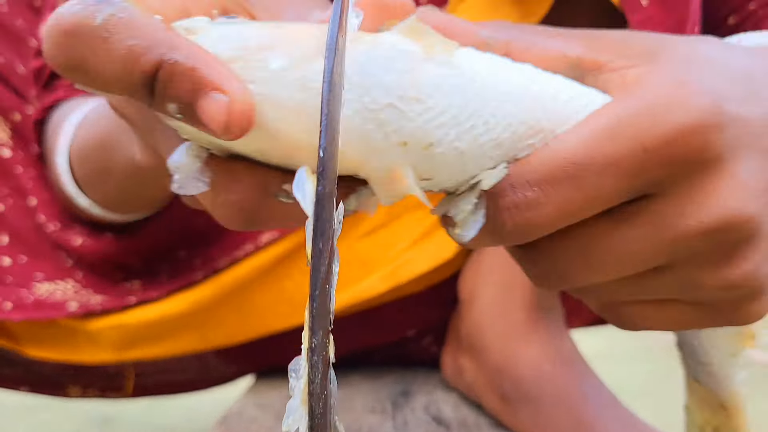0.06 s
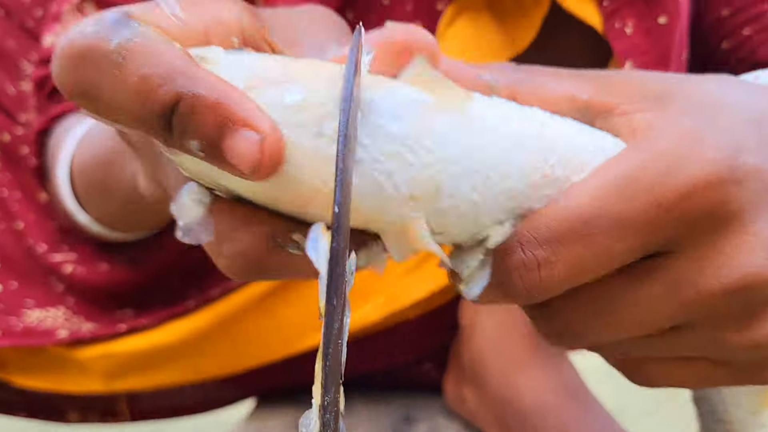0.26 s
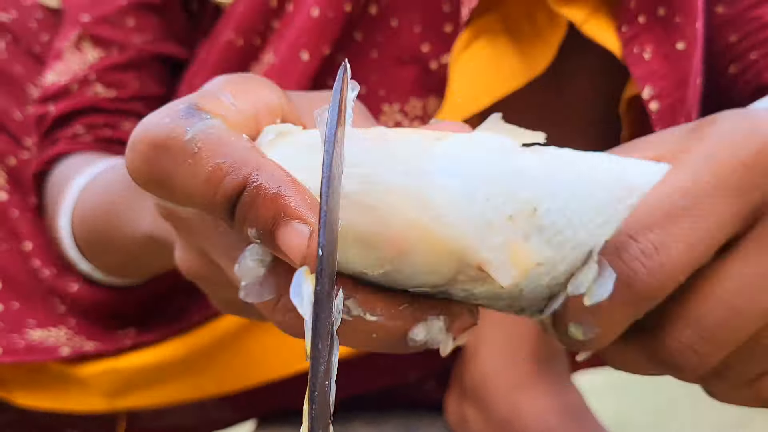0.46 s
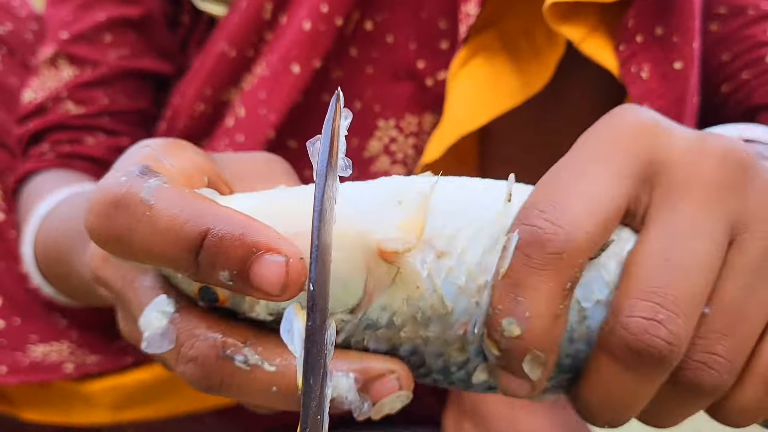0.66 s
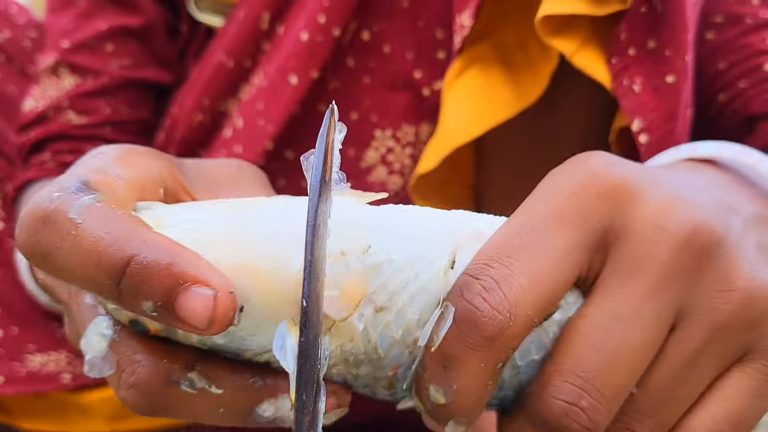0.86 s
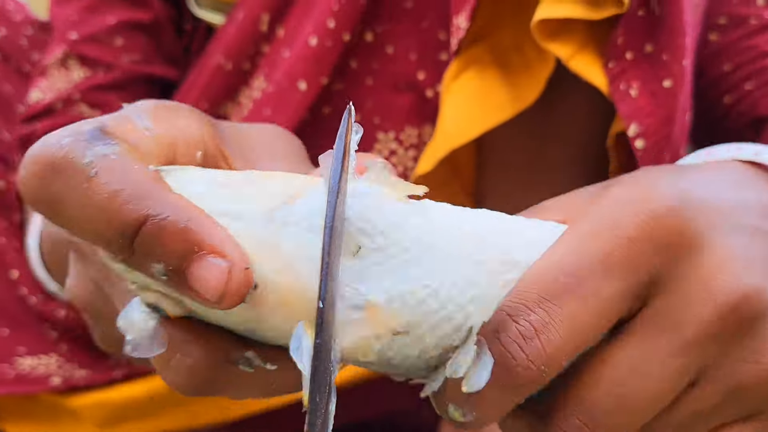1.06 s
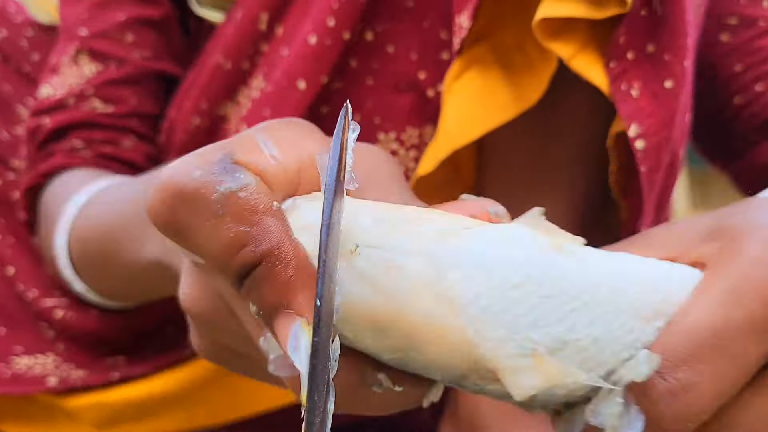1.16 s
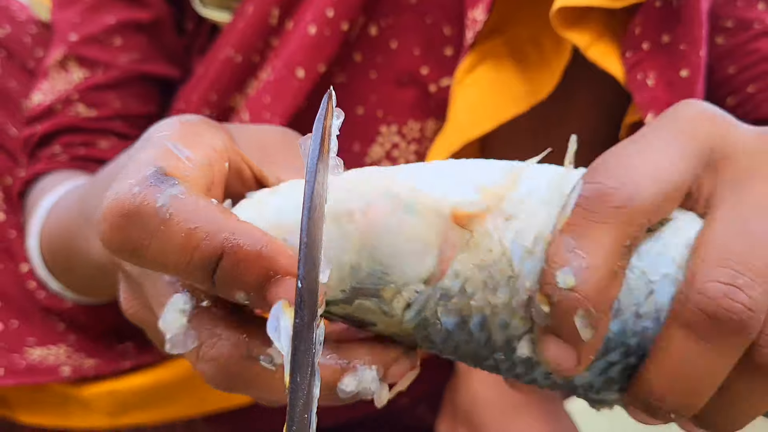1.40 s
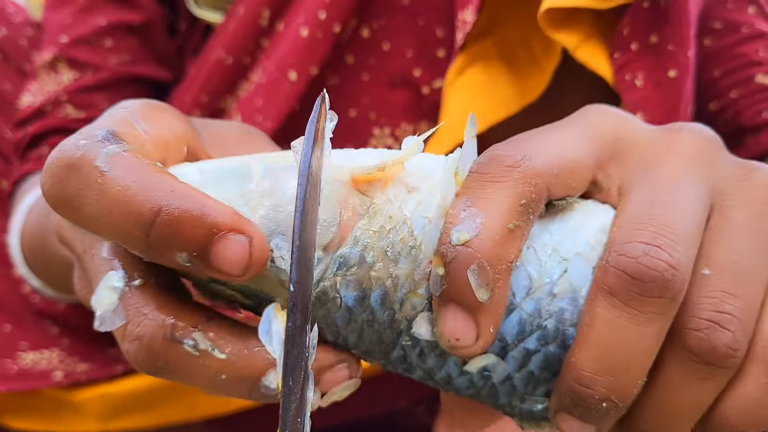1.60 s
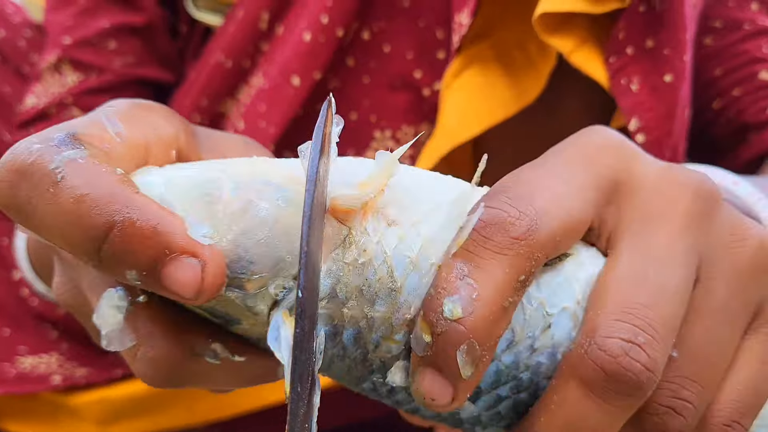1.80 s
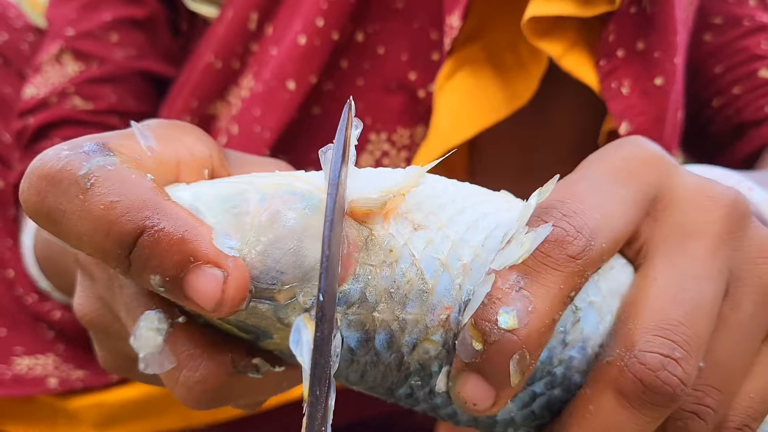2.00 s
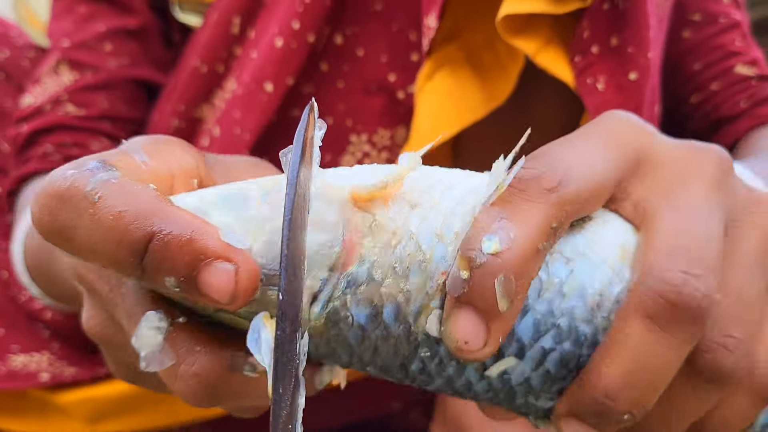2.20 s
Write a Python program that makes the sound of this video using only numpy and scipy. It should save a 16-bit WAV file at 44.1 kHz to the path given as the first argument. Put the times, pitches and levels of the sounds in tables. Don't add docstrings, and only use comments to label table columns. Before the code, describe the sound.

Fish scales rasp over a steel blade, very close and bright. After a faint touch at 0.1 s, a hard crackling stroke at 0.2-0.33 s knocks, rings and briefly squeals. Quiet hand rustle and small ticks follow. A second dense, snapping stroke comes at 1.0-1.1 s, then light wet ticks around 1.75-1.85 and catches at 2.05 s. A distant engine throbs low throughout; a faint bird chirps near 1.6 s.

```python
import sys
import numpy as np
from scipy import signal
from scipy.fft import rfft, irfft
from scipy.io import wavfile
from scipy.ndimage import uniform_filter1d

SR = 44100
rng = np.random.default_rng(int(sys.argv[2]) if len(sys.argv) > 2 else 0)


def linear_from_db(decibels):
    return 10 ** (np.asarray(decibels, float) / 20)


def bounce(signal):
    frames = np.transpose(np.atleast_2d(signal))
    limited = np.clip(frames, -1, 1)
    pcm = np.round(limited * 32767).astype(np.int16)
    wavfile.write(sys.argv[1], SR, pcm)


N = 99225
T = np.arange(N) / SR

# pitch_hz, level_db, t60_s
FOOT_MODES = [(1098, -3.5, 0.053), (1203, 0, 0.17), (1410, 3.5, 0.014), (2050, 3, 0.015)]


def unit(x):
    return x / np.sqrt(np.mean(x ** 2))


def curve(rows, outside=None):
    r = np.array(rows, float)
    return np.interp(T, r[:, 0], r[:, 1], left=outside, right=outside)


def response(points):
    p, size = np.array(points, float), 4096
    log_hz = np.log(np.maximum(np.arange(size // 2 + 1), .5) * SR / size)
    low, high = np.log(p[0, 0]), np.log(p[-1, 0])
    beyond = np.maximum(low - log_hz, 0) + np.maximum(log_hz - high, 0)
    db = np.interp(log_hz, np.log(p[:, 0]), p[:, 1]) - 20 * beyond
    cepstrum = irfft(db * np.log(10) / 20)
    cepstrum[1:size // 2] *= 2
    cepstrum[size // 2 + 1:] = 0
    return irfft(np.exp(rfft(cepstrum)))[:size // 2]


def through(x, h):
    return signal.fftconvolve(np.atleast_2d(x), h[None], axes=1)[:, :N]


def filtered(x, order, hz, kind):
    return signal.sosfilt(signal.butter(order, hz, kind, fs=SR, output="sos"), x)


def decay(t, t60_s):
    return np.exp(-np.log(1000) * t / t60_s)


def ring(modes):
    t = T[:SR // 2]
    h = sum(linear_from_db(db) / np.sqrt(t60) * np.sin(2 * np.pi * hz * t) * decay(t, t60) for hz, db, t60 in modes)
    return h / np.sqrt(np.sum(h ** 2))


def walk(rate_hz):
    k = int(SR / rate_hz)
    steps = np.repeat(rng.standard_normal(N // k + 1), k)
    return unit(uniform_filter1d(uniform_filter1d(steps, k), k)[:N])


def pair(count):
    own, shared = rng.standard_normal((2, count))
    share = 0.99
    return np.array([share * own + np.sqrt(1 - share ** 2) * shared, shared])


def grains(per_s, spread_db, tail_s):
    strength = linear_from_db(spread_db * np.minimum(rng.exponential(size=N), 3))
    hits = (rng.random(N) < per_s / SR) * strength
    return unit(through(hits, np.exp(-T[:SR // 20] / tail_s)) * pair(N))


def bursts(rows):
    rise_ms, click_share = 0.11, 1.2
    out, ms_t = np.zeros((2, N + SR)), T[:SR // 20] * 1000
    for s, db, decay_ms in rows:
        i = int(s * SR)
        shape = np.minimum(ms_t / rise_ms, 1) * np.exp(-ms_t / max(decay_ms, .2))
        energy = np.sum(shape ** 2)
        spray = pair(len(ms_t)) * shape
        spray[:, np.argmax(shape)] = click_share * np.sqrt(energy)
        level = np.sqrt(energy / np.sum(spray ** 2, axis=1))[:, None] / 2
        out[:, i:i + len(ms_t)] += linear_from_db(db) * spray * level
    return out[:, :N]


def scraping():
    # start_s, pressure_db
    strokes = [
        [(.12, -52.5), (.138, -38), (.152, -47), (.165, -74)],
        [(.186, -42), (.204, -41.5), (.208, -28.5), (.222, -32.5), (.241, -32.5), (.256, -26), (.28, -20),
         (.305, -33.5), (.335, -66.5)],
        [(.998, -43), (1.03, -31.5), (1.04, -26.5), (1.06, -23.5), (1.088, -27), (1.1, -40), (1.125, -68),
         (1.155, -43.5), (1.195, -68)],
        [(1.735, -69.5), (1.748, -44.5), (1.77, -78), (1.8, -53.5), (1.82, -54), (1.86, -54)],
        [(2.035, -51), (2.053, -36), (2.068, -36.5), (2.078, -57)],
        [(2.17, -62.5), (2.21, -50), (2.25, -54.5)],
    ]
    stroke_ring_db = [-23, -5.5, -15, -19, -27, -21]
    # start_s, peak_db, decay_ms
    snaps = [(.2068, -13, 2), (.2482, -4.5, 1.4), (.2515, -5.5, 0.45), (.2708, 5, 0.35), (1.005, -4, 0.29),
             (1.0122, -2.5, 0.34), (1.0165, 3, 0.3), (1.0295, 2, 0.37), (1.037, -3.5, 0.33),
             (1.0448, -12.5, 0.59), (1.0475, -14, 0.64), (1.069, -9.5, .4), (1.074, -6.5, .4),
             (1.0838, -4.5, 0.32), (.217, -14, 0.41), (.2216, -15.5, 0.41), (.226, -13, .6),
             (.239, -22, 0.5), (.255, -6.5, 0.73), (.306, -23, 0.45), (.3117, -15, .6), (1.0535, -1, .4),
             (1.0585, 7, 0.43), (1.0648, -6, 0.32), (1.0768, -13.5, 0.59), (1.0815, -5, 0.31),
             (1.0905, -13, 0.38), (2.117, -27.5, 4.4)]
    # pitch_hz, level_db
    crackle_colour = [(600, -27), (2000, -18), (2500, -7.5), (3000, -4), (6000, 4.5), (7200, 3),
                      (8500, -13.5), (11000, -31)]
    # pitch_hz, level_db
    treble_colour = [(9000, -43), (11500, -20.5), (13500, -7), (15500, -15)]
    # pitch_hz, level_db, t60_s
    blade_modes = [(2022, -14, 0.037), (2764, -9.5, 0.037), (3986, -6.5, 0.021), (5130, -44, 0.06),
                   (6440, -24, .04), (6490, -12.5, 0.017), (9300, -23.5, 0.056), (12600, -26, 0.067)]
    # pitch_hz, level_db, t60_s
    held_bend = [(482, 1, .13)]
    body, top = response(crackle_colour), response(treble_colour)
    norm = np.sqrt(np.sum(body ** 2))
    body, top = body / norm, top / norm

    crackle = grains(per_s=2800, spread_db=4.5, tail_s=.0006)
    pressure = [uniform_filter1d(linear_from_db(curve(s, -200)), size=200) for s in strokes]
    hard = crackle * sum(pressure[:3]) + bursts(snaps)
    light = crackle * sum(pressure[3:])
    free = sum(linear_from_db(db) * (p > 1e-6) for p, db in zip(pressure, stroke_ring_db))

    tick, tick_top = ticks()
    thin = filtered(light + tick, 4, 2800, "high")
    foot_rub = linear_from_db(-16.5) * through(free * hard, ring(FOOT_MODES + held_bend))
    foot = filtered(foot_rub + knocks(), 2, 350, "high")
    direct = through(hard + thin, body) + through(hard + light + tick_top, top)
    blade = through(free * (hard + thin), ring(blade_modes))
    return direct + blade + foot + squeal() + pings()


def ticks():
    # start_s, peak_db, treble_db (over the peak)
    tick_rows = [(.1892, -29.5, -5.5), (0.372, -34, 15.5), (.508, -28, 2), (0.539, -35.5, 12),
                 (.711, -35.5, 7), (.924, -33.5, 5), (0.9581, -30, 2), (1.139, -22.5, 1.5), (1.18, -37, 18),
                 (1.229, -37, -8.5), (1.2446, -34, 5), (1.288, -27.5, -2), (1.359, -26, 7),
                 (1.6638, -34.5, 15), (1.6864, -36, 12), (1.694, -31, 5), (1.717, -36.5, 7),
                 (1.7425, -25.5, -4), (1.762, -36, 9.5), (1.7814, -17, 11.5), (1.7884, -25.5, 0),
                 (1.8112, -12.5, -11.5), (1.8152, -21, 4), (1.8352, -26, 7), (1.8481, -25.5, 12.5),
                 (1.9014, -32, -6.5), (1.9745, -19.5, -10), (2.0517, -14, 8), (2.1412, -31, 10),
                 (2.1619, -29, 1.5), (.9987, -35, -2), (1.1008, -31, 0.5), (1.1118, -26.5, 0.5),
                 (1.1162, -28, 1), (1.1533, -31, 0.5), (1.1577, -32, 2), (1.1676, -36, 0), (1.1835, -33, 0),
                 (1.7474, -30, -4), (1.7648, -40, -2), (1.7948, -33, 0), (1.8074, -25.5, 0),
                 (1.8182, -22, 3), (1.8406, -28, 0), (2.0634, -30, 0)]
    tick_ms = 0.8
    tick = bursts([(s, db, tick_ms) for s, db, _ in tick_rows])
    tick_top = bursts([(s, db + top_db, tick_ms / 2) for s, db, top_db in tick_rows])
    return tick, tick_top


def squeal():
    # start_s, length_s, level_db
    slips = [
        (0.2033, 0.007, -27.5),
        (.248, 0.0032, -11),
        (0.264, 0.0045, -12.5),
        (0.2756, 0.00932, -6.5),
        (0.2868, 0.0048, -13),
        (0.29, 0.011, -21),
        (0.308, 0.0089, -27),
        (0.316, 0.0039, -43),
    ]
    # pitch_hz, level_db
    partials = [(6610, -1.5), (9180, -37.5), (14100, -29)]
    edge_s = .001
    gate = sum(linear_from_db(db) * np.clip(np.minimum(T - s, s + length - T) / edge_s, 0, 1)
               for s, length, db in slips)
    tone = 0
    for hz, db in partials:
        wavering_hz = hz * (1 + 0.0044 * walk(300))
        tone = tone + linear_from_db(db) * np.sin(2 * np.pi * np.cumsum(wavering_hz) / SR)
    return gate * tone * linear_from_db(2 * walk(500))


def pings():
    # start_s, pitch_hz, level_db, t60_s
    catches = [(.001, 5300, -32, 0.014), (.012, 624, -47.5, .08), (.045, 6200, -36.5, .04),
               (.134, 6075, -27, 0.056), (0.135, 700, -34.5, .03), (0.138, 1307, -40.5, 0.031),
               (.207, 3770, -19.5, 0.036), (.2075, 1086, -21.5, 0.042), (.213, 1916, -35.5, 0.056),
               (.248, 3920, -22, 0.041), (.248, 484, -35.5, .2), (.249, 1185, -33, .03),
               (0.253, 1175, -29.5, 0.045), (0.269, 3957, -24, 0.11), (.272, 5196, -20, 0.058),
               (.284, 1990, -30.5, 0.066), (.296, 1120, -35, 0.046), (1.018, 1962, -35.5, .04),
               (1.038, 2020, -29, .05), (1.054, 7060, -20.5, 0.059), (1.076, 6050, -12.5, 0.017),
               (1.08, 7080, -13.5, 0.024), (1.085, 494, -53.5, 0.27), (1.286, 3330, -37, 0.029),
               (2.037, 6600, -40, .04), (2.042, 5200, -33, 0.026), (2.05, 6700, -27.5, 0.024),
               (2.052, 5120, -26.5, .025), (2.061, 6730, -29, 0.023), (2.066, 5180, -36, .02),
               (2.069, 6800, -36, 0.013)]
    rise_s = .001
    out, t = np.zeros(N + SR), T[:SR // 4]
    waver = np.r_[walk(250), np.zeros(SR)]
    for s, hz, db, t60 in catches:
        i = int(s * SR)
        turns = hz * t + 3 / t60 * np.cumsum(waver[i:i + len(t)]) / SR
        shape = (1 - np.exp(-t / rise_s)) * decay(t, t60)
        out[i:i + len(t)] += linear_from_db(db) * shape * np.sin(2 * np.pi * turns)
    return out[:N] * linear_from_db(2.5 * walk(400))


def knocks():
    # start_s, level_db, long_ring_db
    knock_rows = [
        (0.139, -45, 2),
        (0.2088, -20, -6.5),
        (0.249, -21.5, -1.5),
        (1.014, -41, -33),
        (1.145, -37.5, -5),
        (1.809, -45.5, -15),
        (2.12, -33.5, 4),
    ]
    # pitch_hz, level_db, t60_s
    bend_modes = [(487.5, 30.5, 0.39), (450, -3.5, 0.356)]
    push, bend = np.zeros(N), np.zeros(N)
    for s, db, ring_db in knock_rows:
        for late_s, push_db in ((0, -9.5), (.001, 0.5), (.0029, -11.5)):
            push[int((s + late_s) * SR)] += linear_from_db(db + push_db)
        bend[int(s * SR)] += linear_from_db(db + ring_db)
    return linear_from_db(9) * (through(push, ring(FOOT_MODES)) + through(bend, ring(bend_modes)))


def rustle():
    # start_s, level_db
    rustle_level = [(0, -46), (.1, -54), (.36, -54.5), (.45, -52.5), (.62, -61.5), (.88, -57.5),
                    (1.22, -59.5), (1.5, -59.5), (1.9, -55.5), (2.25, -54)]
    # pitch_hz, level_db
    rustle_colour = [(1500, -23), (2600, -14.5), (3300, 0.2), (4200, -4), (7300, 0.5), (9000, -22),
                     (10600, -16), (16000, -11)]
    hiss = pair(N) * linear_from_db(1.5 * walk(25) + 1.2 * walk(6))
    hiss = hiss + .4 * grains(per_s=500, spread_db=4, tail_s=.001)
    hiss = unit(through(hiss, response(rustle_colour))) * linear_from_db(curve(rustle_level))
    top = filtered(hiss, 4, 11500, "high")
    return hiss + top * (linear_from_db(2 * walk(5)) - 1)


def engine():
    cylinder_db = [0, -12, -5]
    # cycle_number, start_s of its strong firing
    cycle_times = [(-1, -.035), (3, .219), (5, .346), (7, .493), (9, .646), (13, .936), (22, 1.562),
                   (27, 1.922), (32, 2.263)]
    # pitch_hz, width_hz, level_db
    exhaust = [(65.6, 25, -10.5), (82.2, 11, -11), (101.4, 20, -2.5), (141.5, 20, 5), (165, 9.8, -11)]
    # start_s, level_db
    engine_level = [(0, -38.5), (.25, -40.5), (.6, -44), (1.3, -43.5), (1.6, -42.5), (2.25, -42)]
    jitter_s, scatter_db = 0.0013, 1
    firing = np.arange(-3, 96)
    chance = rng.standard_normal((len(firing), 2))
    fire_s = np.interp(firing / 3, *np.array(cycle_times).T) + jitter_s * chance[:, 0]
    at = (fire_s * SR).astype(int)
    size = linear_from_db(np.array(cylinder_db)[firing % 3] + scatter_db * chance[:, 1])
    heard = (at >= 0) & (at < N)
    pulses = np.zeros(N)
    pulses[at[heard]] = size[heard]
    pipe = ring([(hz, db, 2.55 / width) for hz, width, db in exhaust])

    def tone(x):
        return unit(filtered(through(x, pipe)[0], 4, [50, 170], "band"))

    rumble = tone(rng.standard_normal(N))
    mid = unit(tone(pulses) + linear_from_db(-9) * rumble)
    side = linear_from_db(-15.5) * unit(filtered(rng.standard_normal(N), 4, [50, 170], "band"))
    return np.array([mid + side, mid - side]) * linear_from_db(curve(engine_level))


def bird():
    # start_s, level_db
    chirps = [
        (1.405, -57),
        (1.618, -52),
        (2.185, -57),
    ]
    from_hz, to_hz, length_s = 3850, 3150, .045
    out = np.zeros(N)
    for s, db in chirps:
        u = np.clip((T - s) / length_s, 0, 1)
        hz = from_hz + (to_hz - from_hz) * u ** 1.48
        out += linear_from_db(db) * np.sin(np.pi * u) * np.sin(2 * np.pi * np.cumsum(hz) / SR)
    return out


def air():
    # pitch_hz, level_db
    air_colour = [(170, -9), (190, -6.5), (282, -10.5), (552, -24.5), (800, -34), (3000, -38.5)]
    # start_s, level_db
    air_swell = [(0, -52), (.3, -57.5), (.6, -64), (.85, -62), (1.4, -64.5), (2.25, -59)]

    def wash():
        return unit(through(rng.standard_normal(N), response(air_colour)))[0] * linear_from_db(2 * walk(7.73))

    mid, side = wash(), wash()
    band = filtered(mid, 2, [450, 800], "band")
    mid = mid + (linear_from_db(1.5 * walk(5) + 2) - 1) * band
    return linear_from_db(curve(air_swell) + 3) * (mid + .45 * side * np.array([[1], [-1]]))


def ports(x):
    # pitch_hz, level_db
    left_port = [(300, -13.5), (1000, -2.5), (2500, -8.5), (4000, -13), (6500, -24), (8500, 1), (11000, 4),
                 (14000, -12.5)]
    right_lag_s = .00017
    shade = response([(14, -1)] + left_port + [(21000, 0.9)])
    left = through(x[0], shade)[0]
    right = np.r_[np.zeros(int(right_lag_s * SR)), x[1]][:N]
    return linear_from_db(5) * np.array([left, right])


def scene():
    near = scraping()
    t = T[:SR // 4]
    echo = rng.standard_normal(len(t)) * decay(t, 0.13)
    near = near + linear_from_db(-11) * through(near, echo / np.sqrt(np.sum(echo ** 2)))
    return ports(near + rustle() + bird()) + engine() + air()


def top_cut(x):
    return signal.sosfilt(signal.butter(12, 16370, fs=SR, output="sos"), x)


def record(dry):
    soft = dry / (1 + np.abs(dry / 1.05) ** 4) ** .25
    cut = signal.sosfilt(signal.ellip(8, .2, 60, 16300, fs=SR, output="sos"), soft)
    return top_cut(cut)


dry = scene()
out = record(dry)
bounce(out)
```